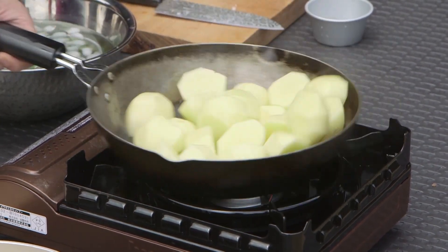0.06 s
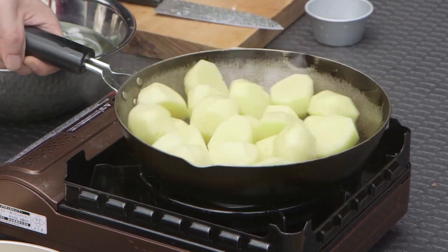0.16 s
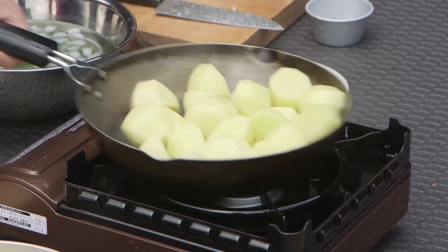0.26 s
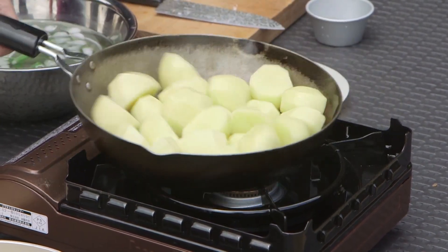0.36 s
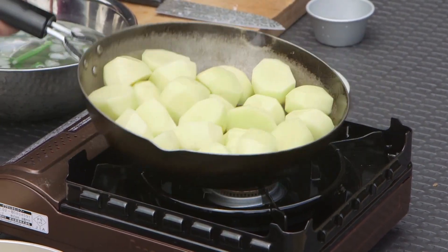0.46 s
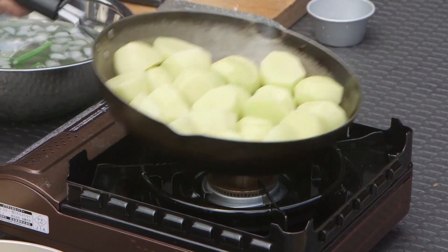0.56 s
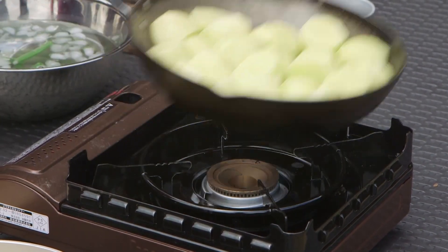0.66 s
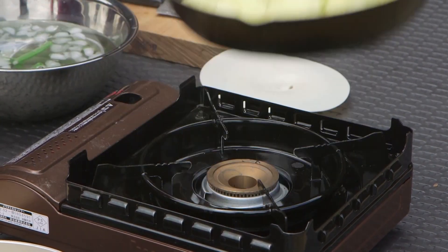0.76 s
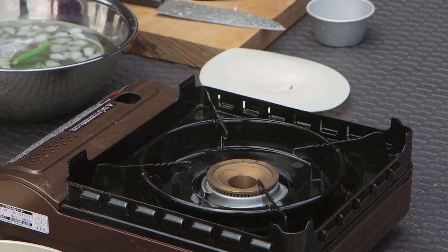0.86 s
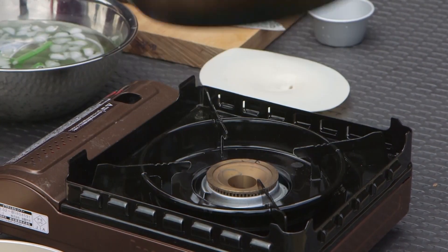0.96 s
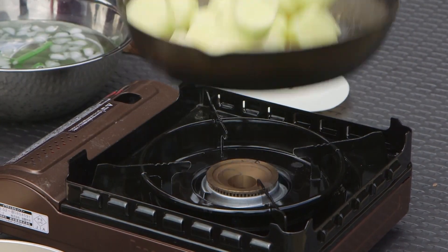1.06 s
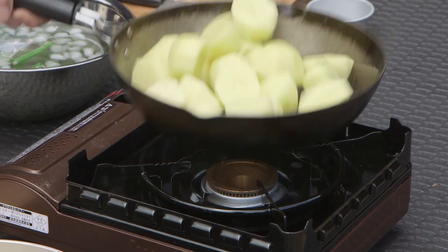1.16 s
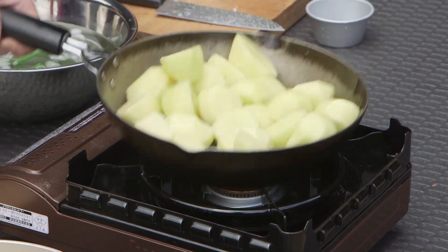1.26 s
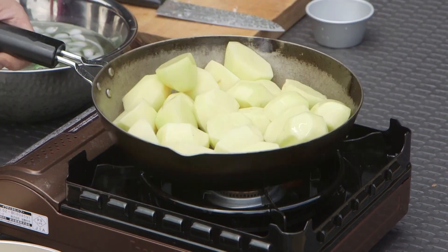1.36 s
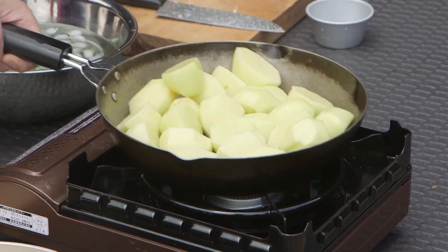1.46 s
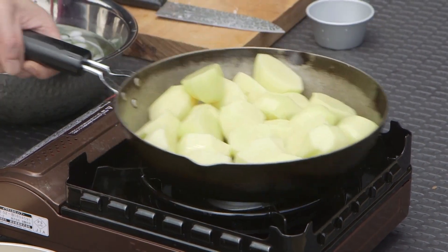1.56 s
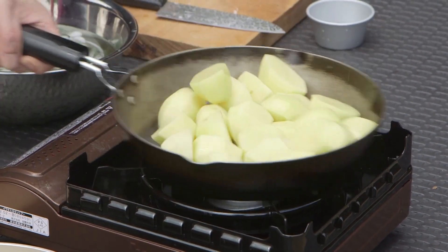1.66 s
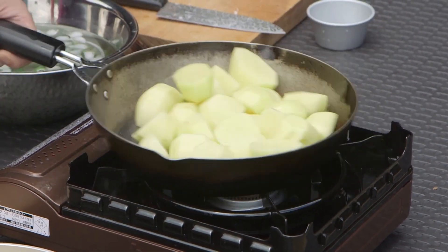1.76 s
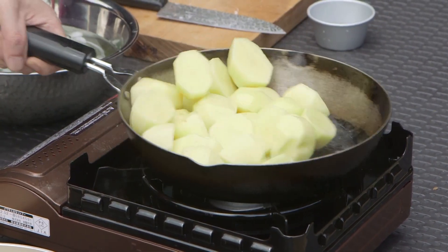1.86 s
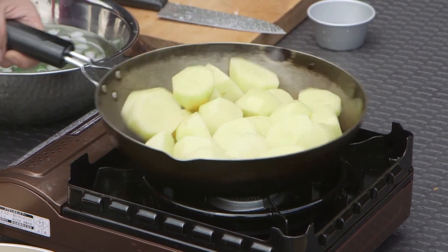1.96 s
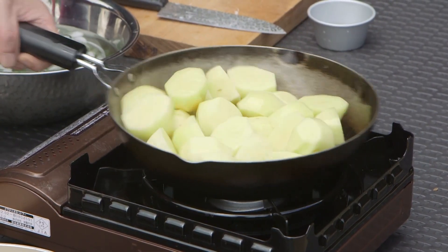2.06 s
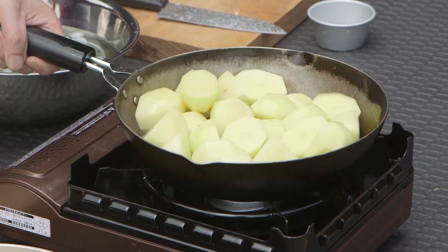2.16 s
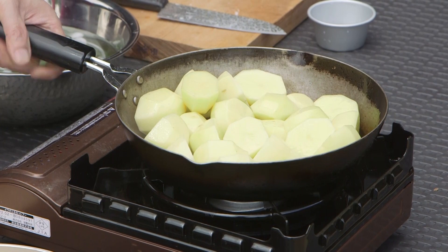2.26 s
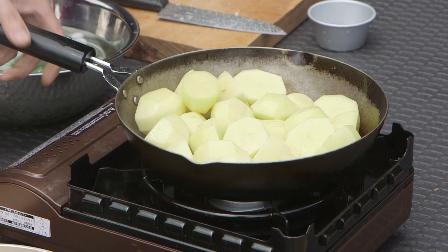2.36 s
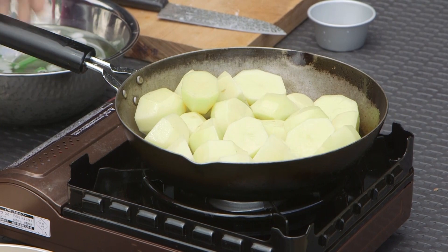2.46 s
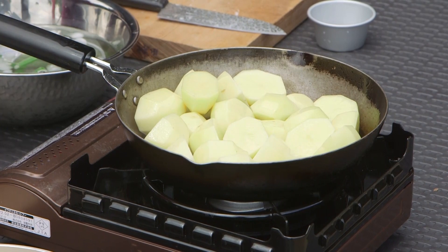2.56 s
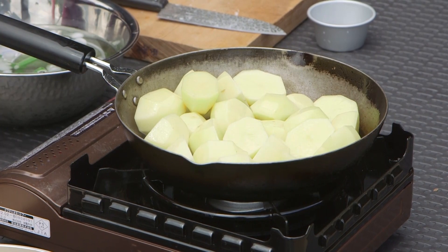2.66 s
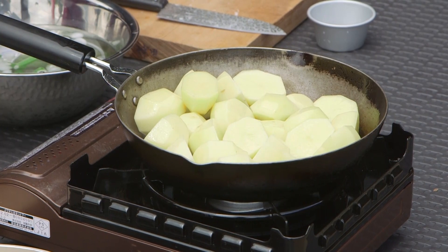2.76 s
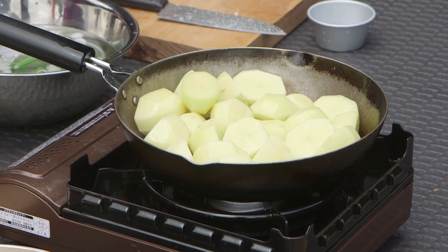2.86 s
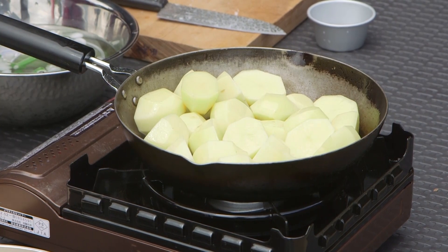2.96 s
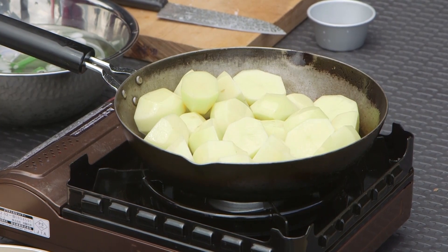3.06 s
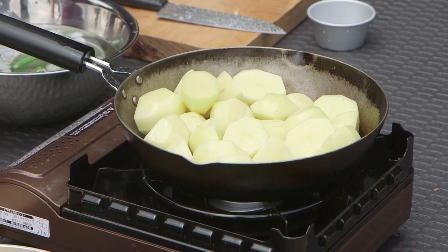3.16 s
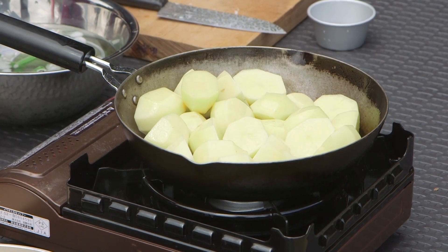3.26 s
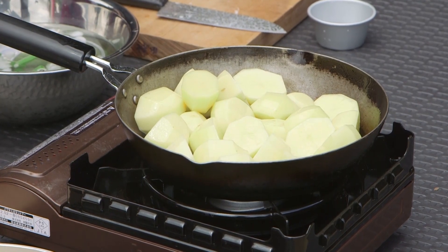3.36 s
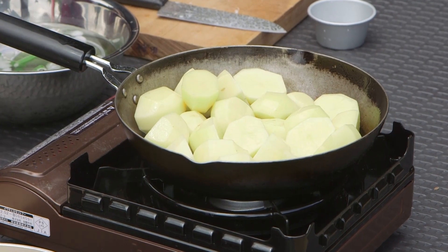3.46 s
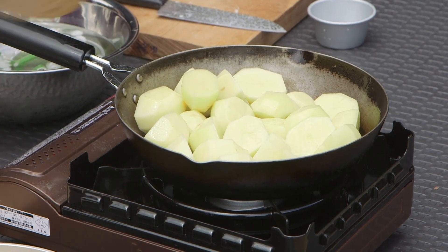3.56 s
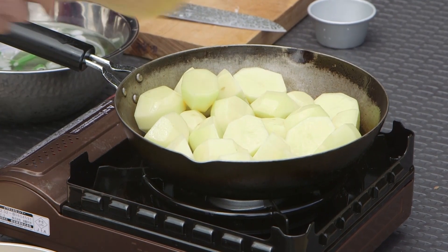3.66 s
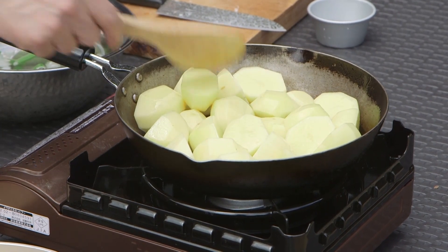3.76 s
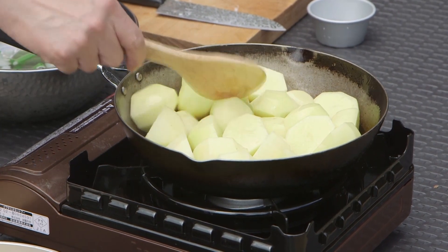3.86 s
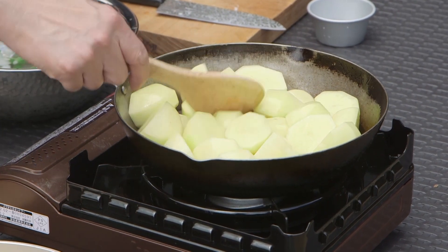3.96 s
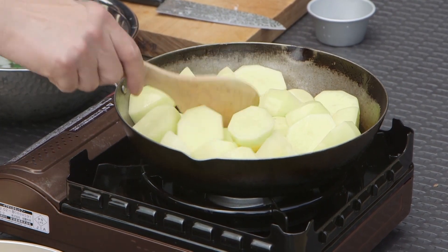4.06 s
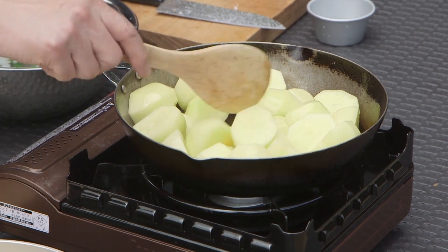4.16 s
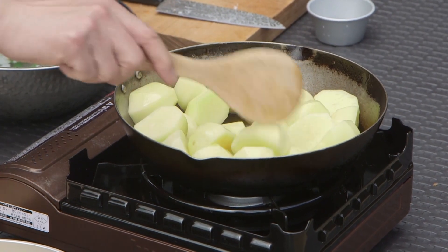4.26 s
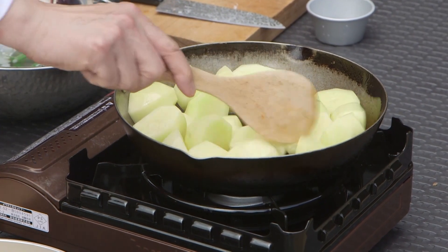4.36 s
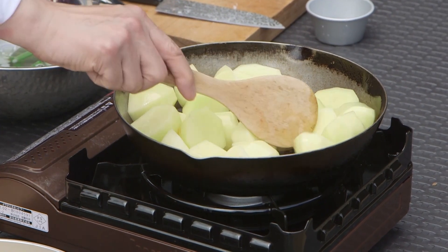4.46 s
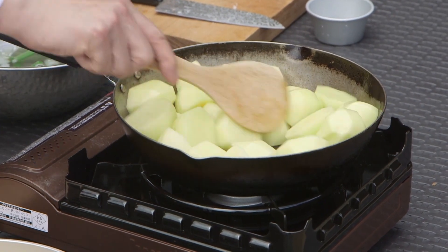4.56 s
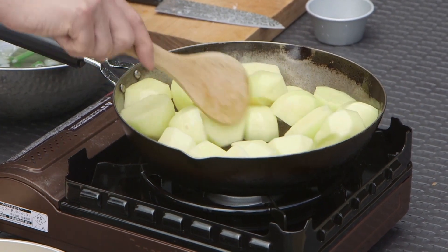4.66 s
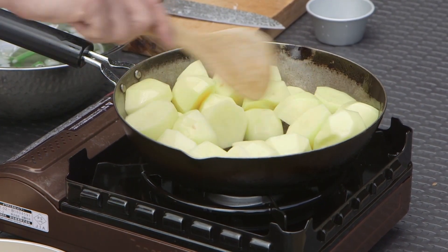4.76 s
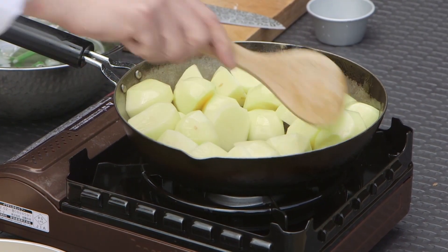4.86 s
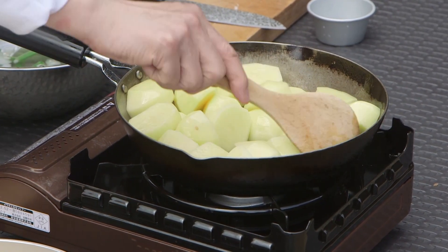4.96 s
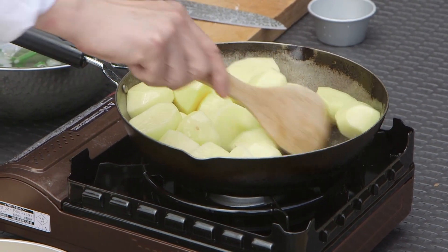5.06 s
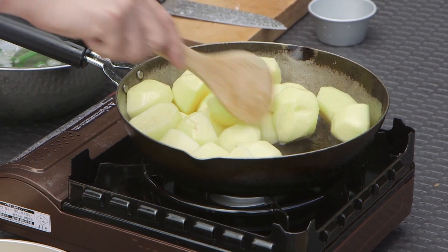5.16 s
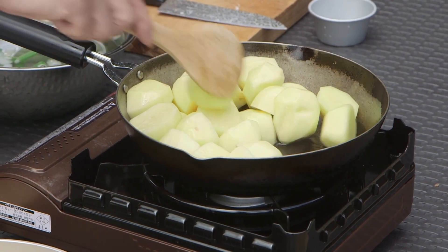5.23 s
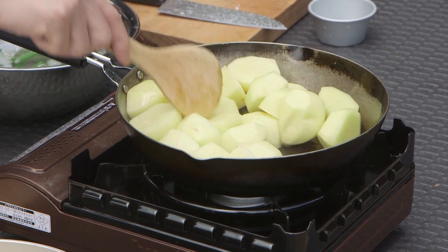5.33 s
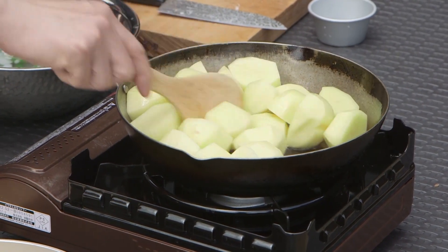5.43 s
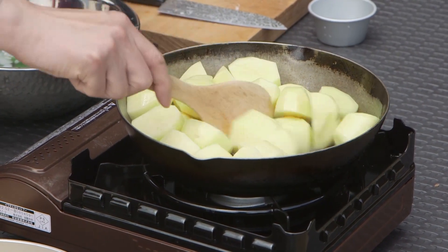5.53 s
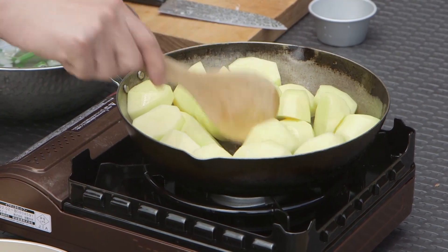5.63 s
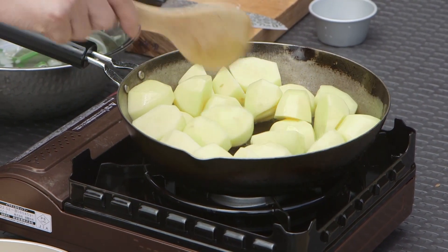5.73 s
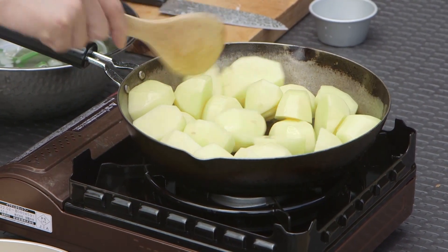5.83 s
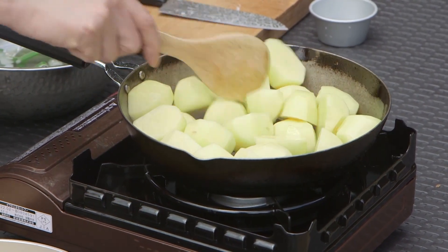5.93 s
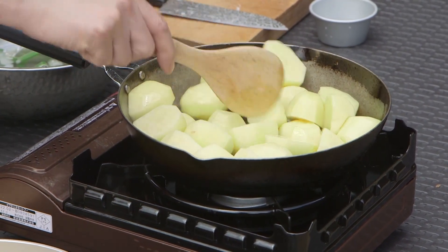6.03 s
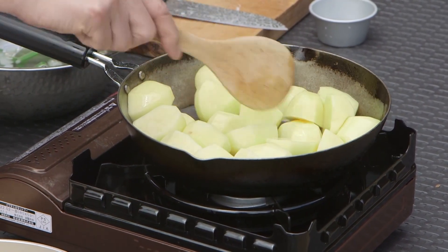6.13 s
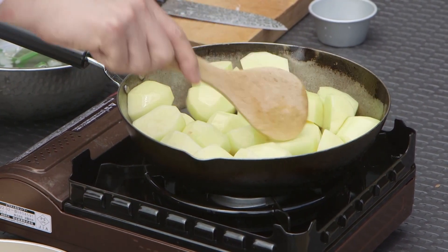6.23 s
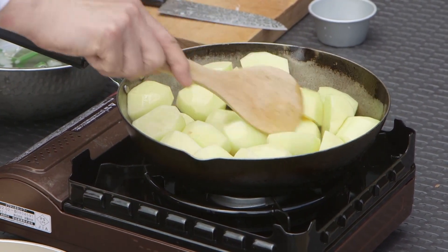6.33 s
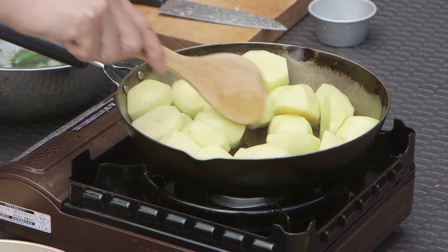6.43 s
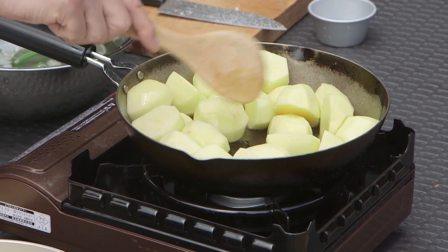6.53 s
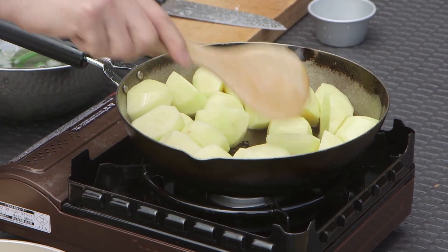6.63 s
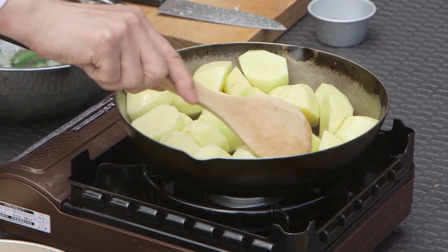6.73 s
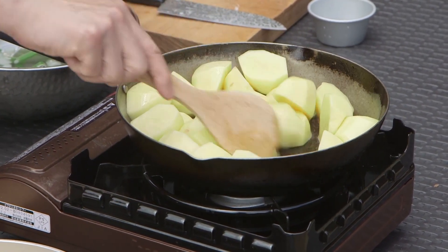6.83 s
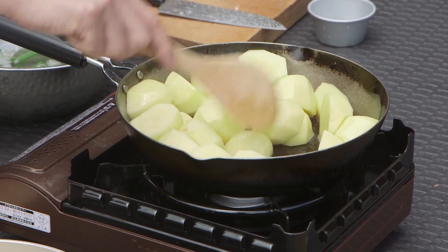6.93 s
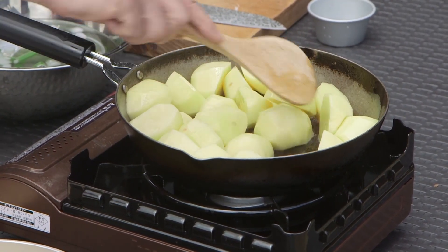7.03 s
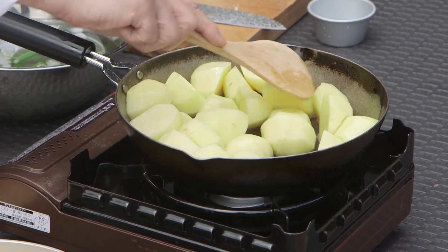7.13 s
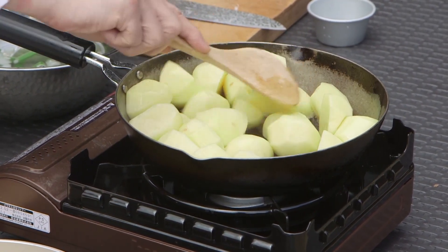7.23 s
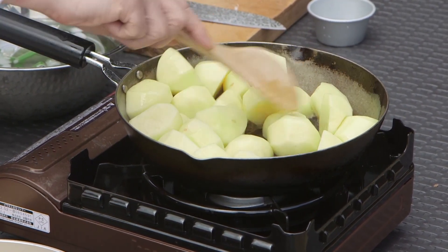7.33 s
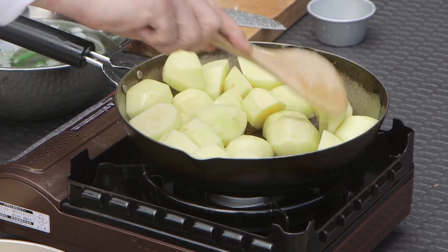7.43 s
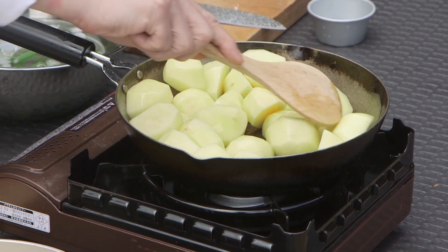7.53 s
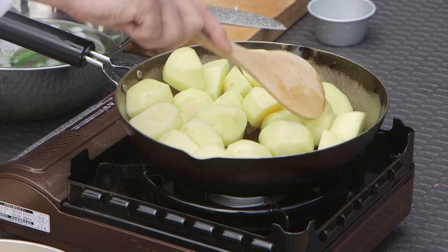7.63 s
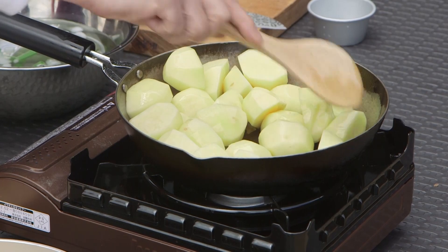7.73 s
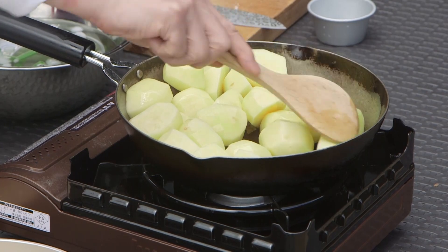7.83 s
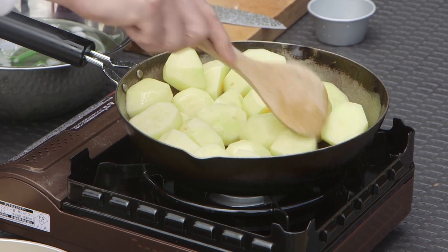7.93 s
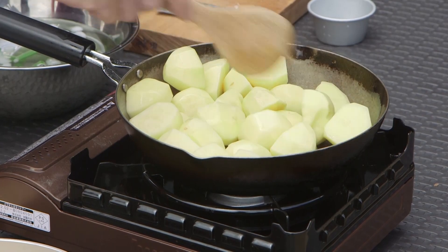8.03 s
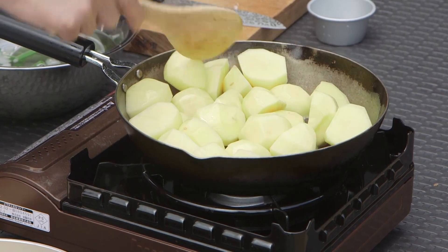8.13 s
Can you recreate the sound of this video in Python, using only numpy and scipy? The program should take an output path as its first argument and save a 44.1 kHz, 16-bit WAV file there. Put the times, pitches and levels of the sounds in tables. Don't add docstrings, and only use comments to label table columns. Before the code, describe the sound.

Crackling, popping oil fries under potatoes; the pan rattles and lands on its metal grate, then come hollow wooden spatula taps and dull table knocks.

```python
import sys
import numpy as np
from scipy import signal
from scipy.fft import rfft, irfft, next_fast_len
from scipy.io import wavfile
from scipy.ndimage import map_coordinates

SR = 44100
rng = np.random.default_rng(int(sys.argv[2]) if len(sys.argv) > 2 else 0)


def persist_wave(psi):
    counts = np.round(np.clip(psi, -1, 1) * 32767).astype(np.int16)
    wavfile.write(sys.argv[1], SR, np.atleast_2d(counts).T)


def voltage_ratio(decibels):
    exponent = np.asarray(decibels, float) / 20
    return 10 ** exponent


N = 361253


def unit(x):
    return x / np.sqrt(np.mean(x ** 2) + 1e-20)


def along(points, hz):
    point_hz, point_db = np.transpose(points)
    return voltage_ratio(np.interp(np.log(hz + 1), np.log(point_hz + 1), point_db))


def curves(rows):
    s, *columns = np.transpose(rows)
    return [np.interp(np.arange(N) / SR, s, column, -120, -120) for column in columns]


def wobble(rate):
    knots = rng.standard_normal(int(N * rate / SR) + 4)
    return map_coordinates(knots, [np.arange(N) * rate / SR])


def filtered(x, response):
    m = next_fast_len(N + SR // 4)
    return irfft(rfft(x, m) * response(np.fft.rfftfreq(m, 1 / SR)), m)[..., :N]


def body(modes):
    def response(f):
        total = 0
        for k, (centre, width, db) in enumerate(modes):
            damping = 1j * f * width
            total = total + (-1) ** k * voltage_ratio(db) * damping / (centre * centre - f * f + damping)
        return total
    return response


def crackle(count, spread_db, hiss):
    when, size, sign = rng.random((count, 3)).T
    impacts = voltage_ratio(-spread_db * np.log(size + .02)) * np.sign(sign - .5)
    spikes = np.bincount((when * N).astype(int), impacts, N)
    return unit(unit(spikes) + hiss * rng.standard_normal(N))


def bursts(times, levels_db, t60s):
    out, t = np.zeros(N + SR), np.arange(SR // 4) / SR
    for s, db, t60 in zip(times, levels_db, t60s):
        decay = voltage_ratio(db - 60 * t / max(t60, 1e-3))
        out[round(s * SR):][:len(t)] += decay * rng.standard_normal(len(t))
    return out[:N]


def bubbles(count, centre_hz, octaves, cycles, spread_db):
    when, size = rng.random((count, 2)).T
    hz = np.clip(centre_hz * 2 ** (octaves * rng.standard_normal(count)), 900, 15000)[:, None]
    step = np.arange(160)
    start_db = -spread_db * np.log(size + 0.01)[:, None]
    ring = voltage_ratio(start_db - 40 * step / SR * hz / cycles) * np.sin(2 * np.pi * hz * step / SR)
    at = (when * N).astype(int)[:, None] + step
    return unit(np.bincount(at.ravel(), ring.ravel(), N + 160)[:N])


def strokes(starts, levels_db, builds, holds, settles):
    gain, t = np.zeros(N), np.arange(N) / SR
    for s, db, build, hold in zip(starts, levels_db, np.broadcast_to(builds, len(starts)), holds):
        first, last = s - 3 * abs(build), s + abs(hold) + 3 * settles
        near = slice(max(0, round(first * SR)), round(last * SR))
        early = np.maximum(s - t[near], 0)
        late = np.maximum(t[near] - s - abs(hold), 0)
        gain[near] += voltage_ratio(db - 20 * early / abs(build) - 20 * late / settles)
    return gain


def frying():
    # start_s, steam_db, spray_over_sizzle_db
    fry = [(0.0, -35.5, 1), (0.63, -30.5, -1), (0.97, -38, -5), (1.09, -34.5, -0.5), (1.4, -34.5, -3.5),
           (1.62, -31, -1), (2.45, -33, -0.5), (3.45, -35.5, -2.5), (4.05, -33.5, 0), (4.75, -31.5, -0.5),
           (5.35, -35, -2.5), (5.75, -33, 0), (6.05, -30.5, -3.5), (6.73, -32, -4.5), (7.15, -35, -1),
           (7.58, -32, -2.5), (7.87, -35, -3.5), (8.19, -34.5, 2)]
    # hz, level_db (per Hz)
    sizzle_colour = [(290, -42), (500, -21), (564, -5.5), (719, -23.5), (949, -6.5), (1110, -8.5),
                     (1380, -5), (1980, -3), (2130, -0.5), (3380, 1), (9000, -9.5), (11700, -33),
                     (19800, -120)]
    # hz, level_db (per Hz)
    spray_colour = [(3500, -9), (5500, -4.5), (7000, 0.5), (8600, -0.5), (10200, 0.5), (12200, -3),
                    (14200, -6.5), (15900, -13)]
    sizzle_db, open_db = curves(fry)
    spray_db = sizzle_db + open_db

    sizzle = crackle(count=14000, spread_db=6.0, hiss=0.97)
    sizzle = unit(filtered(sizzle, lambda hz: along(sizzle_colour, hz)))
    sizzle += voltage_ratio(-9.0) * bubbles(count=2500, centre_hz=3030, octaves=0.17, cycles=5.8, spread_db=5.5)

    spray = crackle(count=24000, spread_db=5.0, hiss=0.51)
    spray = unit(filtered(spray, lambda hz: along(spray_colour, hz)))
    spray += voltage_ratio(-5.0) * bubbles(count=3000, centre_hz=7970, octaves=0.322, cycles=23, spread_db=3.5)

    sizzle_gain = voltage_ratio(sizzle_db - 4.0 + 0.2 * wobble(14) + 1.05 * wobble(45))
    spray_gain = voltage_ratio(spray_db - 5.0 + 0.36 * wobble(12) + 1.25 * wobble(30))
    return sizzle_gain * sizzle + spray_gain * spray


def all_pops(count):
    # start_s, cavity_db, pitch_hz
    largest = [(0.0038, -19, 2630), (0.4322, -20.5, 3140), (0.5215, -22, 6290), (0.9415, -21.5, 3520),
               (1.234, -24, 3770), (1.4618, -18, 3600), (1.6556, -12, 3750), (1.839, -23, 3030),
               (2.043, -22, 1600), (2.343, -19, 2630), (2.4529, -19, 5800), (2.6007, -14.5, 3480),
               (2.9803, -19, 6070), (3.098, -16, 2500), (3.2898, -17, 3540), (3.3944, -16.5, 3480),
               (3.6647, -15, 3500), (3.83, -18, 4720), (3.9501, -19, 4230), (4.016, -14, 3720),
               (4.7022, -16, 3270), (4.9663, -18.5, 5300), (5.611, -20, 1940), (6.6173, -16, 5400),
               (6.6644, -18.5, 2970), (6.864, -19, 3050), (6.9475, -20, 3180), (7.4587, -17, 3370),
               (7.533, -19, 3880), (7.6999, -12.5, 3650)]
    when = rng.random(count) * (N / SR)
    size, pitch = rng.standard_normal((count, 2)).T
    small = [when, -26 + 1.9 * size, 3420 * 2 ** (.3 * pitch)]
    return np.vstack([largest, np.transpose(small)])


def pops(rows):
    out, t = np.zeros(N + SR), np.arange(400) / SR
    for s, db, hz in rows:
        film = 0.24 * np.convolve(rng.standard_normal(len(t)), np.hanning(7), "same")
        cavity = np.sin(2 * np.pi * hz * t)
        out[round(s * SR):][:len(t)] += voltage_ratio(db + 3.5 - 60 * t * hz / 18) * (cavity + film)
    return filtered(out[:N], lambda hz: (1j * hz / (1j * hz + 1100)) ** 3)


def spatter(rows):
    # start_s, crack_db
    spits = [(0.6681, -21), (0.7714, -15), (0.82, -16), (1.141, -15), (1.1725, -13), (1.4245, -23),
             (1.553, -12), (1.747, -18), (2.0513, -14), (2.1218, -9), (2.218, -12), (2.374, -10.5),
             (2.4524, -9), (2.7083, -12), (2.9182, -13.5), (3.6439, -16), (4.2206, -14), (4.409, -21),
             (4.469, -14), (4.8106, -11), (4.8398, -14), (5.611, -27), (5.9597, -12), (6.4816, -11),
             (7.626, -10), (7.9965, -30), (8.0116, -13), (8.04, -21.5), (8.0828, -13)]
    s, db = np.transpose(spits)
    tear_db = rows[:, 1] - 11
    small_spit_db = -26 + 2.0 * rng.standard_normal(len(rows))
    s = np.append(s, rows[:, 0])
    db = np.append(db, np.maximum(tear_db, small_spit_db))
    colour = lambda hz: (1j * hz / (1j * hz + 3500)) ** 2 / (1 + 1j * hz / 11000) ** 2
    return filtered(bursts(s, db + 1.5, np.full(len(s), .005)), colour)


def grate():
    # start_s, scrape_db, build_s, hold_s, steel_edge_over_scrape_db
    drags = [(0.0, -26, .02, .06, -5.5), (0.168, -25.5, .05, 0.024, -6.5), (0.291, -22, 0.042, 0.047, -9),
             (0.4, -25, 0.018, 0.0069, -23), (0.938, -42, 0.019, .001, 3), (1.036, -42, .02, 0.026, -14),
             (1.277, -43.5, 0.25, .03, -11), (1.337, -26.5, 0.0069, 0.041, -5),
             (1.46, -22, .006, .015, -15), (1.645, -30.5, 0.11, 0.025, -12),
             (1.754, -22, 0.047, 0.016, -24), (1.838, -25, .005, 0.063, -18),
             (2.036, -19.5, .07, 0.013, -4), (2.085, -32.5, .05, 0.079, -14),
             (7.524, -34, 0.035, 0.034, -4)]
    # start_s, rumble_db, hold_s
    jolts = [(0.0, -34.5, 0.21), (0.25, -35.5, 0.24), (0.775, -52, .02), (1.085, -52, .08),
             (1.347, -28.5, .001), (1.504, -40, 0.11), (1.66, -36.5, .04), (1.75, -31, .01),
             (1.855, -35, 0.1), (2.045, -31, 0.052), (2.22, -47, 0.1), (2.684, -51, .01),
             (3.022, -50.5, 0.095), (3.395, -46, .01), (3.8, -45, 0.3), (4.19, -45.5, 0.094),
             (4.656, -43, 0.11), (4.39, -39.5, .15), (4.985, -43.5, 0.22), (5.349, -35.5, .08),
             (5.663, -41, 0.14), (5.893, -41.5, .3), (6.292, -45, 0.3), (6.851, -38.5, .11),
             (7.165, -53, .1), (7.317, -44.5, .02), (7.523, -40, 0.036), (7.71, -49, .03),
             (7.865, -44, .01), (8.01, -54, 0.17)]
    # start_s, peak_db, t60_s
    clanks = [
        (1.3338, -12, 0.084),
        (1.459, -32, 0.041),
        (1.6532, -24, 0.14),
        (1.7472, -23, 0.06),
        (1.8333, -20.5, 0.18),
        (1.8884, -20.5, 0.064),
    ]
    # centre_hz, width_hz, level_db
    grate_modes = [(152, 81, -9), (438, 146, -0.5), (569.7, 19.6, 7.5), (648, 32, 0), (861, 66, 3),
                   (1013, 108, -0.5), (1380, 760, -8.5), (1735, 510, -5), (2400, 1000, -8.5),
                   (2970, 1330, -9)]
    steel_modes = [(910, 450, 2), (1790, 610, -3.5), (2260, 300, 4.5), (3260, 470, 3.5), (3960, 350, 2.5),
                   (5480, 1200, -5.5)]
    stove_modes = [(102.6, 30, -7), (151, 27.6, 0.5), (201, 40, 0.5), (322, 109, -6.5), (542, 147, -8)]
    rattle = unit(filtered(crackle(count=8000, spread_db=3.0, hiss=1.0), body(grate_modes)))
    grind = unit(filtered(crackle(count=8000, spread_db=8.0, hiss=1.0), body(steel_modes)))
    rumble = unit(filtered(crackle(count=3000, spread_db=2.5, hiss=0.74), body(stove_modes)))

    s, db, build, hold, edge_db = np.transpose(drags)
    drag = strokes(s, db - 5.0, build, hold, settles=0.08) * rattle
    drag += strokes(s, db + edge_db - 5.0, build, hold, settles=0.08) * grind
    s, db, hold = np.transpose(jolts)
    shake = strokes(s, db - 3.5, 0.042, hold, settles=0.13) * rumble
    s, db, t60 = np.transpose(clanks)
    return drag + shake + filtered(bursts(s, db + 4.5, t60), body(steel_modes))


def spatula():
    # start_s, peak_db, blade_click_db, rim_db
    taps = [(2.993, -42, 11, 9.5), (3.925, -30.5, -5, 4), (3.984, -21, -14, -15), (4.501, -24, -10, -13),
            (4.6, -33.5, -9, -4), (5.058, -25, -5, -22), (5.168, -36.5, 7.5, -2), (5.341, -30.5, -5, -7),
            (5.476, -14.5, 0.5, -10), (5.689, -39, -3, -10), (5.799, -24, -14, -21),
            (5.884, -30.5, -4, -13), (5.981, -17, -22, -13), (6.039, -23, -8, -15), (6.169, -40, 8, -9),
            (6.37, -31, -9, -11), (6.882, -14.5, -22, -9), (7.509, -41, 12, -7)]
    # centre_hz, width_hz, level_db
    bowl_modes = [(156, 44, -42), (531, 29.4, 8), (2180, 150, -24)]
    rim_modes = [(740, 640, -1.5), (993, 73, 10), (1350, 120, -3)]
    blade_modes = [(1337, 59, 5), (1720, 240, 0), (2060, 180, -3), (2500, 910, -4), (2860, 220, 1),
                   (3840, 200, -26)]
    s, db, click_db, rim_db = np.transpose(taps)
    at = np.round((s + 0.00075) * SR).astype(int)

    def blow(level_db):
        return np.bincount(at, voltage_ratio(level_db), N) + bursts(s, level_db - 12.0, np.full(len(s), .015))

    soft = lambda hz: 1 / (1 + 1j * hz / 3000)
    bounce = lambda hz: 1 + .5 * np.exp(-2j * np.pi * hz * 0.00245)
    blade = filtered(blow(db + click_db + 26.5), lambda hz: body(blade_modes)(hz) * bounce(hz) * soft(hz))
    bowl = filtered(blow(db + 31.5), body(bowl_modes))
    rim = filtered(blow(db + rim_db + 26.5), body(rim_modes))
    return bowl, rim + blade


def table():
    # start_s, peak_db
    knocks = [(0.717, -38), (1.08, -37), (2.653, -45), (3.019, -38.5), (3.38, -38), (3.77, -34.5),
              (4.192, -35.5), (4.608, -37), (4.974, -36.5), (5.347, -35), (5.708, -38.5), (6.319, -47),
              (6.535, -40), (7.162, -40), (7.306, -38), (7.677, -36.5)]
    # centre_hz, width_hz, level_db
    table_modes = [(130, 40, -28), (203, 50, -3), (355, 58, 7.5)]
    s, db = np.transpose(knocks)
    t60s = np.full(len(s), .07)
    return np.array([filtered(bursts(s, db + 18.0, t60s), body(table_modes)) for _ in range(2)])


def air():
    # hz, level_db (per Hz)
    air_colour = [(20, 3.5), (45, -9), (62, 7), (80, -33), (200, -8), (350, -2), (700, -11.5), (1000, -5),
                  (1500, 0.5), (2200, 3.5), (3300, -120)]
    murmur = filtered(rng.standard_normal((2, N)), lambda hz: along(air_colour, hz))
    return voltage_ratio(-50 + 2.5 + 1.7 * wobble(3.8)) * unit(murmur)


def far_pair(x):
    lateness = (.0245, .0223)
    # hz, level_db
    left_colour = [(100, 4.5), (500, -4.5), (1300, -1.5), (3000, 2), (8000, -2.5), (15000, -8)]
    right_colour = [(100, 0.5), (500, 2), (1300, 8.5), (3000, 0), (8000, 2.5), (15000, 11)]
    hop, t = 1024, np.arange(512) / SR
    fade = np.sin(np.pi * (np.arange(2 * hop) + .5) / (2 * hop))
    padded = np.pad(x, (hop, 2 * hop))
    starts = np.arange(0, N + hop, hop)
    pieces = padded[starts[:, None] + np.arange(2 * hop)] * fade
    sides = []
    for late_s, colour in zip(lateness, (left_colour, right_colour)):
        paths = voltage_ratio(-60 * t / 0.0044) * rng.standard_normal((len(starts), len(t)))
        paths = irfft(np.exp(1j * np.angle(rfft(paths))))
        paths = paths * voltage_ratio(-60 * t / 0.04)
        paths = paths / np.linalg.norm(paths, axis=1, keepdims=True)
        heard = signal.fftconvolve(pieces, paths, axes=1)
        at = starts[:, None] + np.arange(heard.shape[1]) + round(late_s * SR)
        side = np.bincount(at.ravel(), heard.ravel())[hop:][:N]
        sides.append(filtered(side, lambda hz: along(colour, hz)))
    return np.array(sides)


def scene():
    # hz, level_db
    near_colour = [(100, -4), (500, 0), (1300, 2), (15000, 2)]
    bowl, edge = spatula()
    burst = all_pops(count=60)
    cooking = frying() + pops(burst) + grate()
    near = cooking + edge + spatter(burst) + voltage_ratio(-8.0) * bowl
    near = filtered(near, lambda hz: along(near_colour, hz))
    far = far_pair(cooking + bowl + voltage_ratio(-3.0) * edge)
    cut = lambda hz: (1j * hz) ** 2 / ((1j * hz) ** 2 + 1j * hz * 80 + 98 ** 2)
    close_sounds = filtered(near + far + table(), lambda hz: cut(hz) ** 2)
    return close_sounds + voltage_ratio([[4.0], [-4.0]]) * air()


def top_cut(x):
    return signal.sosfilt(signal.butter(12, 16310, fs=SR, output="sos"), x)


def record(dry):
    held = dry / (1 + np.abs(dry / .62) ** 4) ** (1 / 4)
    mix = filtered(held, lambda hz: hz < 15950)
    return top_cut(mix)


dry = scene()
out = record(dry)
persist_wave(out)
```